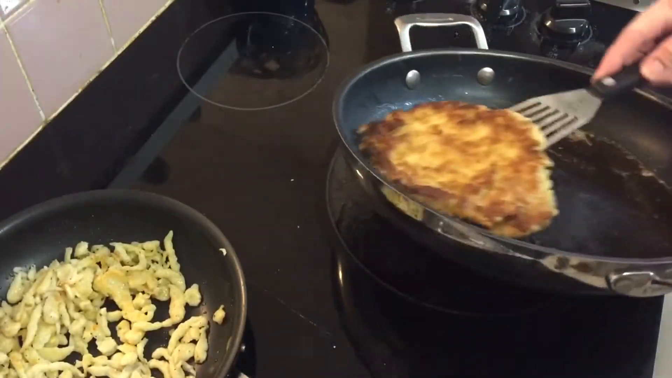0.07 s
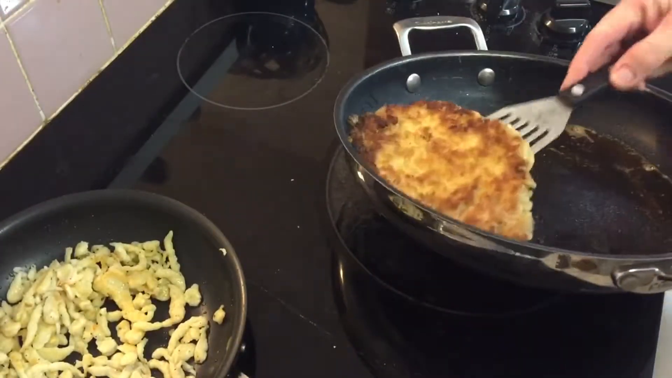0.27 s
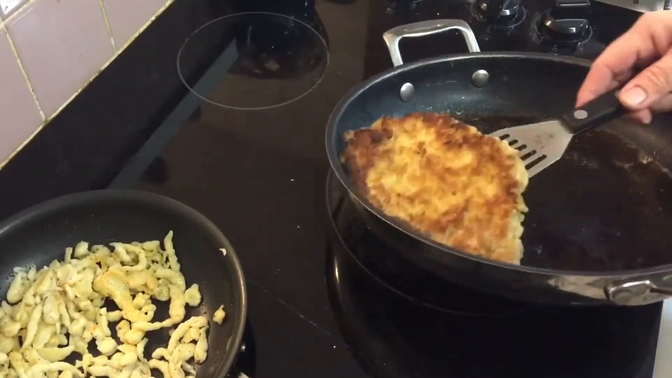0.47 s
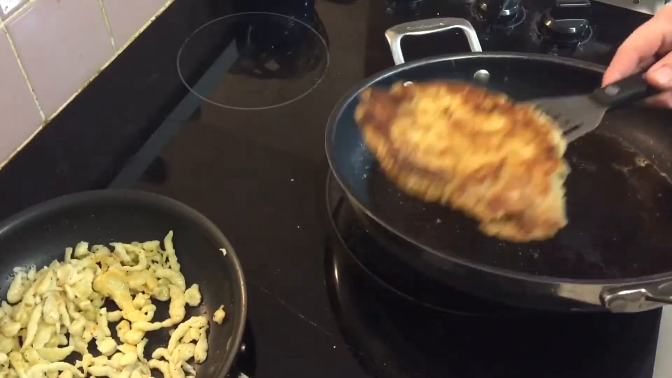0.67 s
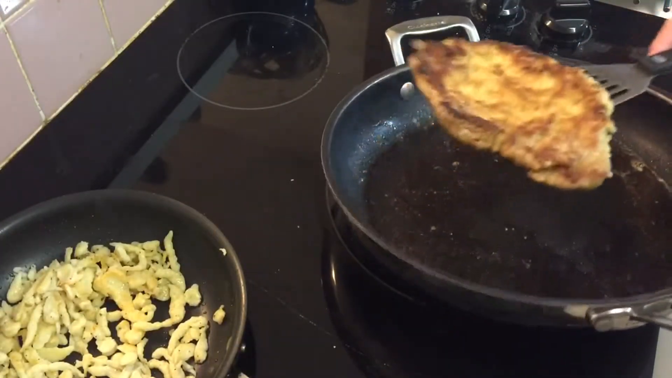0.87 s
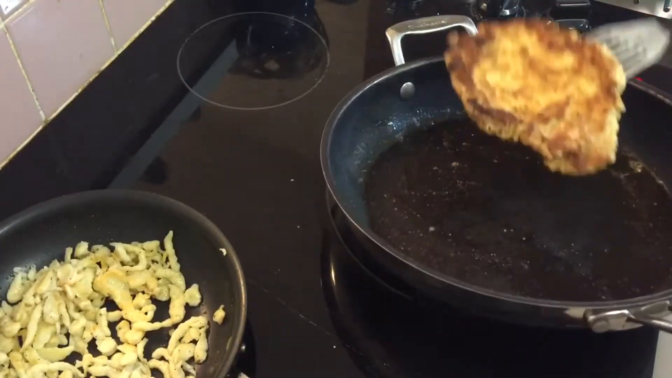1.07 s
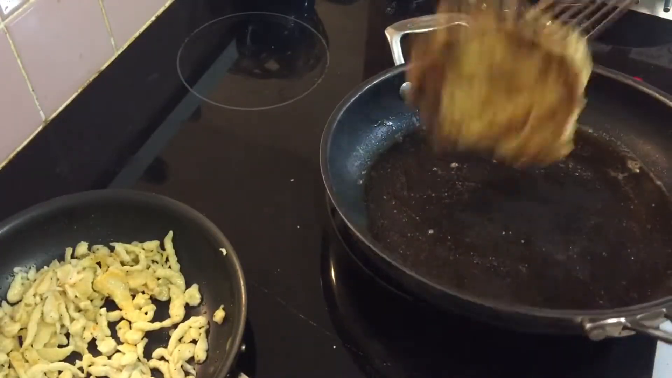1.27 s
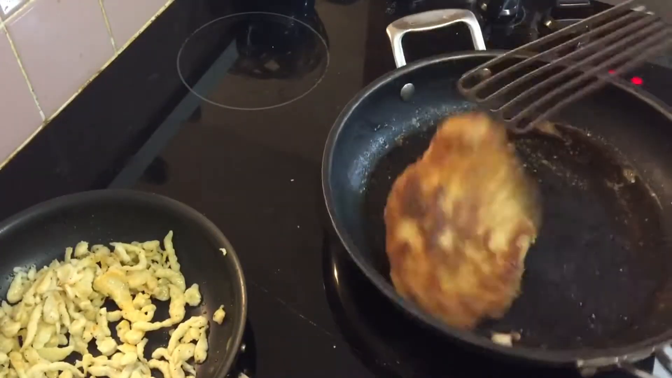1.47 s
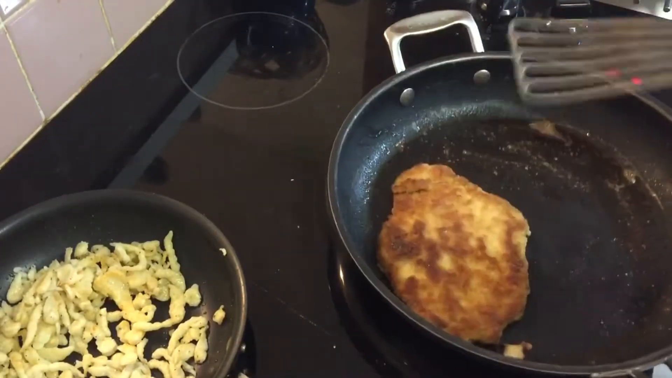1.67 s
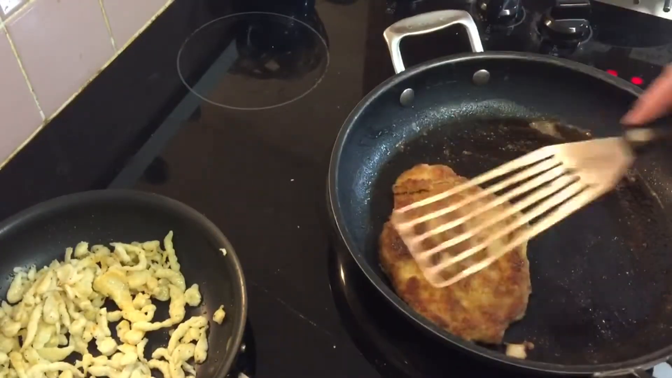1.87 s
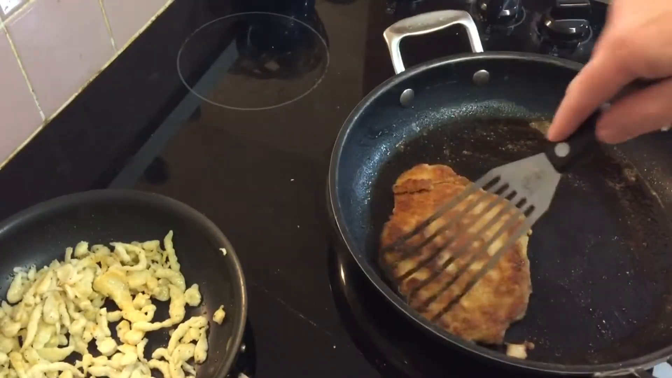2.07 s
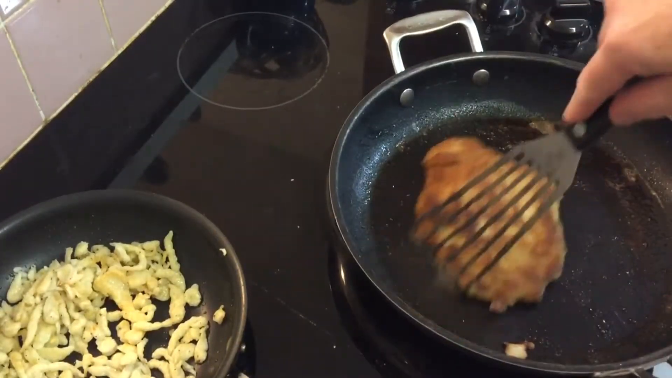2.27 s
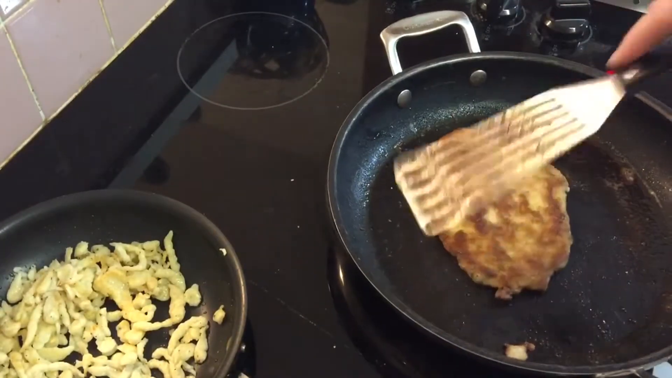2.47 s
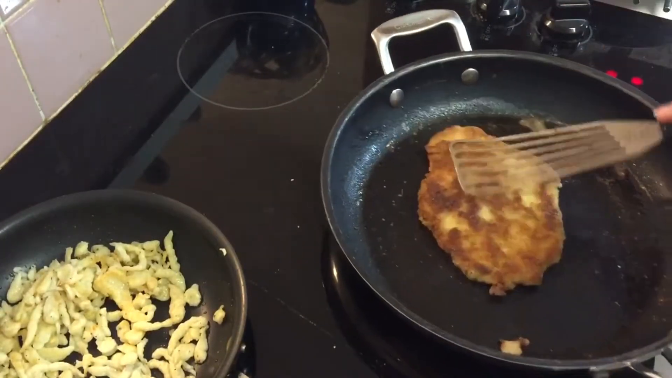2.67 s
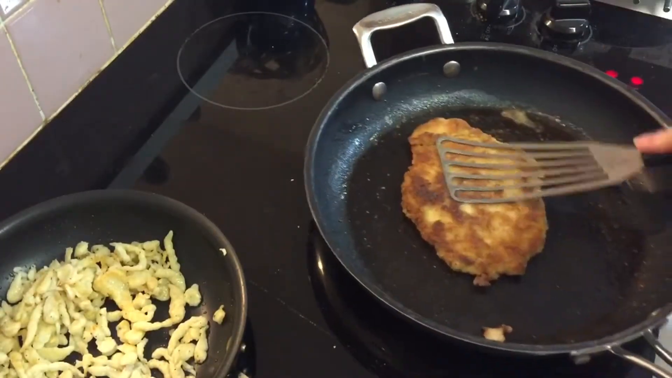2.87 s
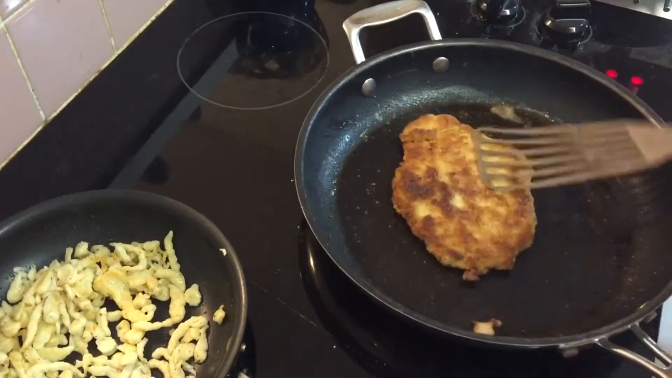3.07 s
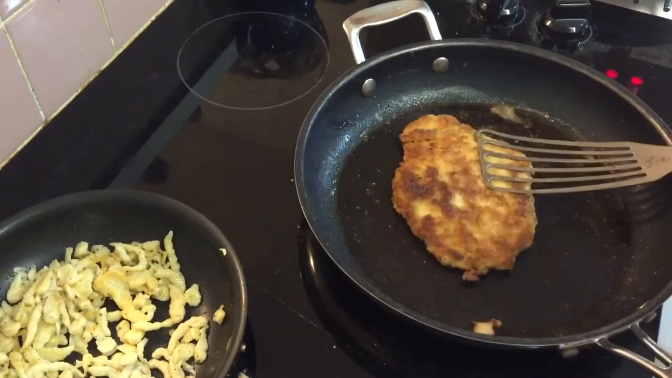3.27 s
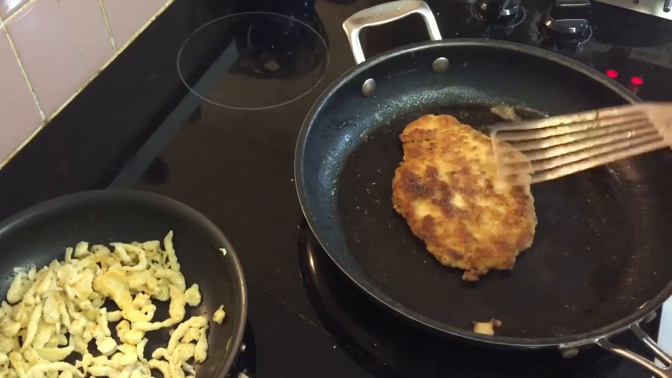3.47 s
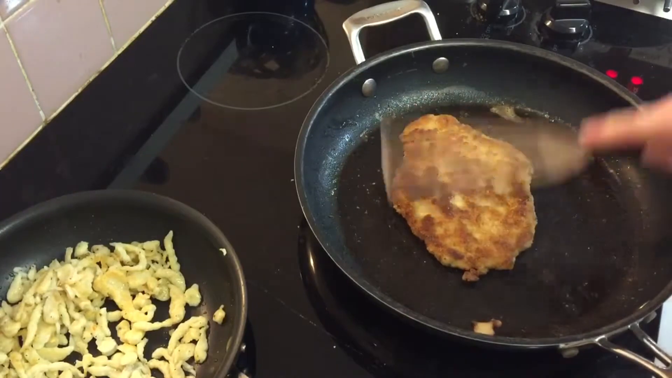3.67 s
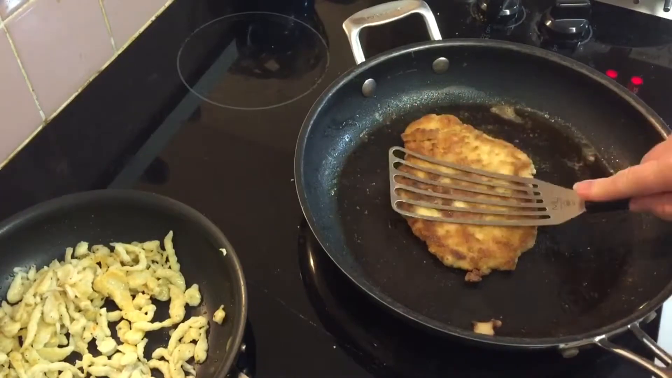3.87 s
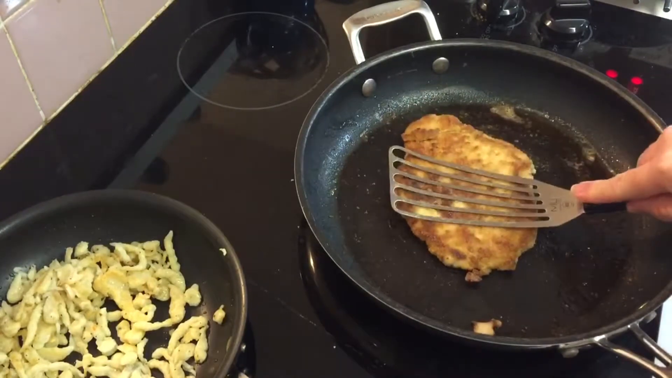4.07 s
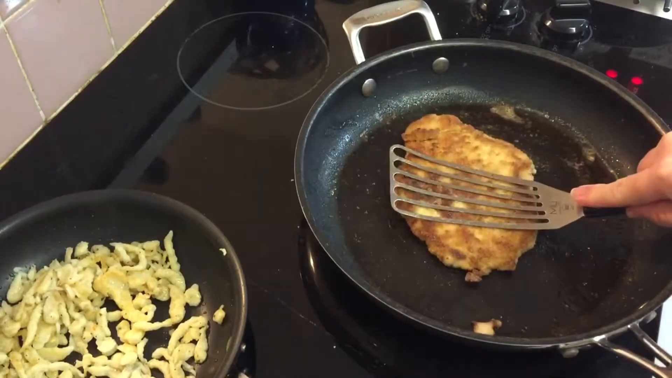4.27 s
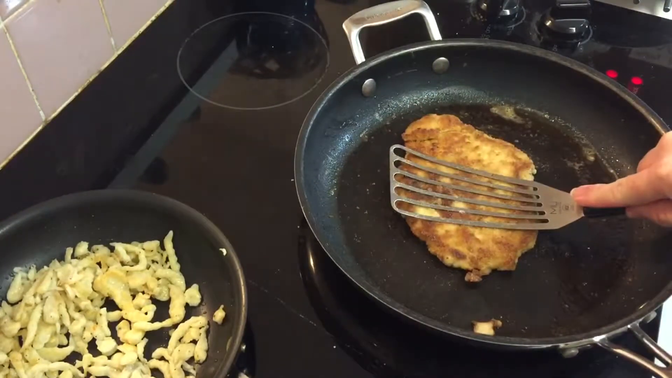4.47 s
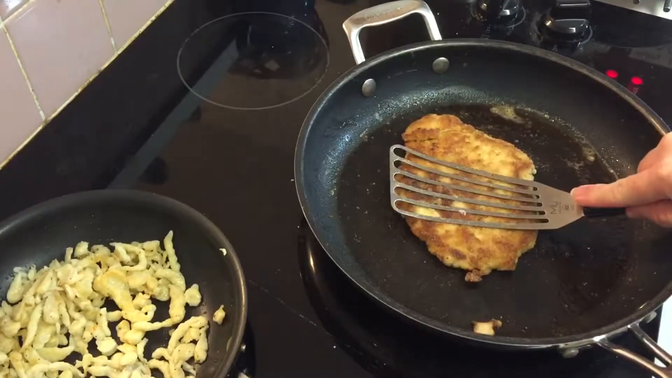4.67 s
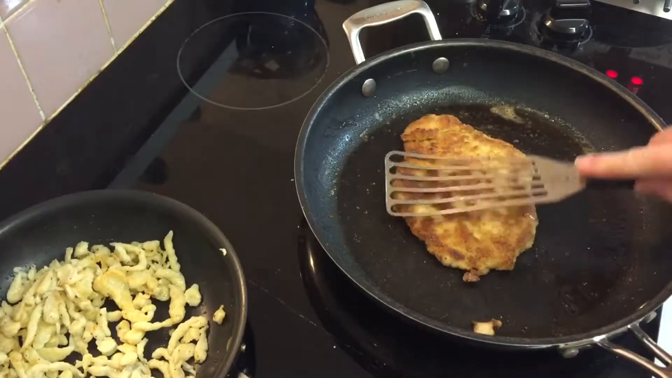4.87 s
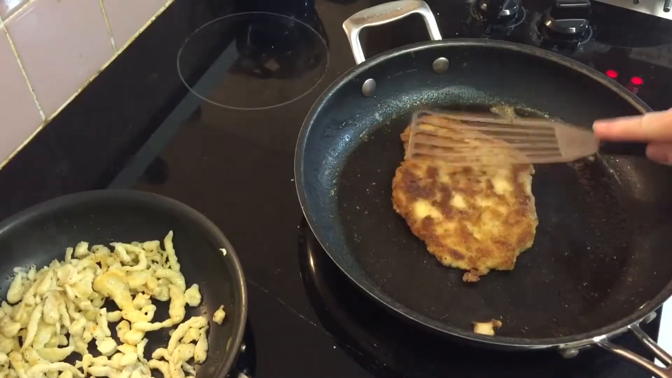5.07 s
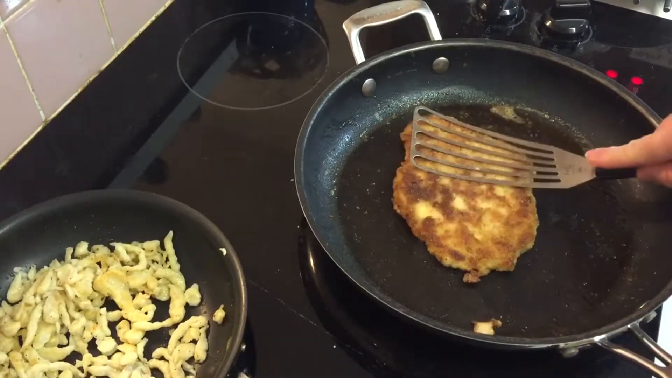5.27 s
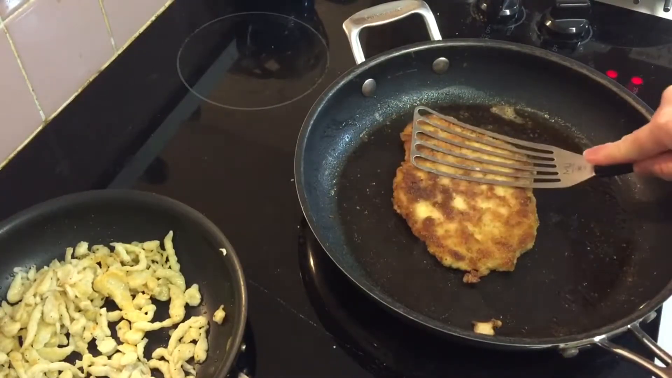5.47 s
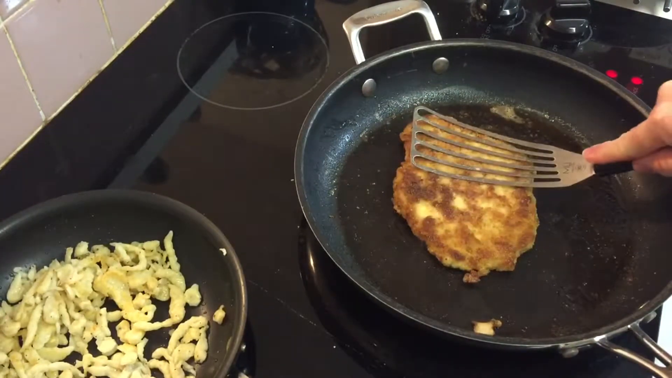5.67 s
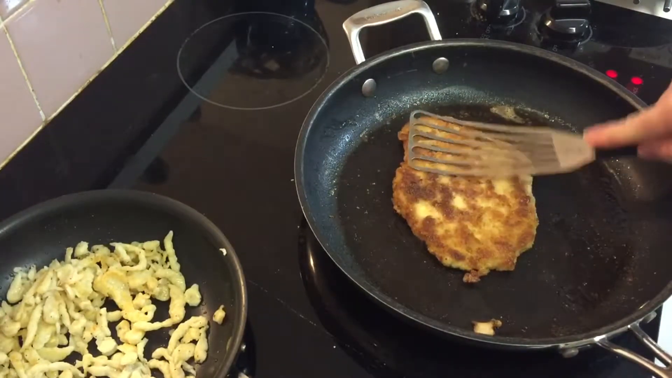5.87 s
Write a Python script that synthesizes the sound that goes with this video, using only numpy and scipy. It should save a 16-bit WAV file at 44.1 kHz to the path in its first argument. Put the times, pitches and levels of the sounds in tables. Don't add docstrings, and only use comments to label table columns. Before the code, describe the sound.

Close and dry, over a faint low mains hum and soft fan murmur, a thin sizzle opens with light, raspy metal scrapes of a spatula until about 0.6 s, with small bumps near 0.4 s. The frying drops to almost nothing while the cutlet is lifted; isolated oil drops pop with dull plops, clustering from 0.97 to 1.11 s. At about 1.4-1.7 s the meat lands with soft low knocks, a short scrape and a gush of steam with faint breathy whistles. Fine crackling spits follow around 1.9-2.03 s. A stronger dull pat thuds at 2.15 s, then a bright steam burst and sharp snap at 2.34 s. Sizzling grows; another firm, clicking pat hits at 3.21 s and a lighter metallic tap at 3.78 s, among loud spits. From 3.9 s pressing brings a full, dense sizzle, easing around 5 s, with small pops and a barely audible tap near 5.16 s, then continuing steadily to the end.

```python
import sys
import numpy as np
from scipy import signal
from scipy.fft import rfft, irfft
from scipy.io import wavfile

SR = 44100
rng = np.random.default_rng(int(sys.argv[2]) if len(sys.argv) > 2 else 0)


def magnitude_from_level(level_db):
    exponent = np.asarray(level_db, float) / 20
    return 10 ** exponent


def master(y):
    cut = np.clip(np.atleast_2d(y).T, -1, 1)
    pcm = np.round(cut * 32767)
    wavfile.write(sys.argv[1], SR, pcm.astype(np.int16))


N = 261513

# time in seconds, level in dB.
HUM_LEVEL = [
    (0, -57.5),
    (1.7, -58.5),
    (2.1, -61.5),
    (3.02, -61),
    (3.24, -58),
    (3.85, -60),
    (3.93, -70),
    (3.98, -59),
    (5.93, -59.5),
]
# frequency in Hz, level in dB per Hz.
FAN_COLOUR = [(15, -64), (25, -22), (69, -2.5), (94, -7), (119, 1.5), (145, -8), (189, -8), (246, 0.5),
              (325, -7.5), (700, -22.5), (910, -66), (1540, -120)]
# peak in seconds, level in dB, rise in seconds, fall in seconds.
HOB_SHUDDERS = [
    (0.124, -58.5, .02, 0.27),
    (1.58, -58, 0.031, 0.39),
    (1.71, -56, 0.26, 0.041),
    (2.175, -46, .01, 0.21),
    (2.8, -65.5, .1, 0.72),
    (.62, -66, .05, 0.17),
    (3.27, -49.5, 0.021, 0.11),
]
# start in seconds, length in seconds, first pitch in Hz, last pitch in Hz, level in dB.
STEAM_WHISTLES = [
    (1.66, .49, 1012, 960, -55),
    (2.41, .15, 1750, 2250, -47),
    (2.46, .12, 2650, 2700, -53),
    (2.47, .13, 965, 994, -58),
    (1.74, .44, 2100, 2050, -58.5),
    (1.8, .33, 297, 300, -63),
    (1.41, .09, 1700, 1750, -48),
    (5.5, .6, 3500, 3510, -50),
]
# time in seconds, peak in dB,
# favoured pitch in Hz, fall away from it in dB per octave, contact time in seconds.
PAT_HITS = [(0.39, -43, 290, 12, 0.04), (0.44, -47.5, 204, 3, .014), (1.388, -43.5, 252, -6, 0.019),
            (1.569, -42, 213, 15, 0.014), (1.615, -29.5, 1390, -1, 0.014), (1.62, -29.5, 284, -5.8, 0.0081),
            (1.646, -35.5, 180, 2, 0.016), (1.691, -47.5, 55, 8, 0.041), (2.153, -35, 1120, -3, 0.0033),
            (2.155, -20.5, 290, 21, 0.0067), (2.168, -39, 306, 22, 0.0074), (2.184, -32.5, 196, 13, .02),
            (3.143, -45, 128, 12, 0.0029), (3.2106, -25.5, 2300, -10, 0.0024),
            (3.2107, -20.5, 330, 16.5, 0.0054), (3.2217, -28.5, 534, 9, 0.029), (3.211, -32, 97, 10, .01),
            (3.782, -25.5, 2095, 15, 0.0027), (3.784, -32, 720, 15, 0.0057), (3.782, -33.5, 146, 1, 0.0028),
            (5.165, -45, 950, 12, 0.0025), (5.164, -50.5, 230, 9, .004), (5.318, -53, 199.5, 10, .009)]
# pitch in Hz, level in dB, time to fall
# 60 dB in seconds.
HOB_AND_PAN_TONES = [(55, -0.5, 0.36), (97, 7.5, 0.089), (155, 1, 0.11), (196, -2, 0.102),
                     (290, 4, 0.033), (338, 4, 0.024), (419, -7, 0.044), (488, -8.5, 0.032), (588, -7, 0.063),
             (765, -3.5, 0.022), (950, -11, 0.024), (1120, 1.5, 0.042), (1420, -4.5, 0.038),
             (1610, 4, 0.051), (2040, 0, 0.026), (2310, -18, 0.036), (2500, 6, 0.036), (3400, 7, .02)]
# start in seconds, length in seconds, level in dB,
# favoured pitch in Hz, fall away from it in dB per octave.
BLADE_STROKES = [(-.04, 0.074, -54.5, 3750, 9), (-.03, 0.12, -57, 2850, 36), (0, 0.18, -55.5, 1900, 40),
                 (0.094, 0.095, -61, 4300, 10), (0.186, .08, -59.5, 2700, 40),
                 (0.293, .11, -47.5, 2700, 26), (0.305, 0.088, -51.5, 1935, 25),
                 (0.343, 0.12, -49, 2310, 45), (0.364, 0.07, -48.5, 4570, 6.5), (.42, 0.17, -64, 2420, 17),
                 (1.515, 0.064, -48.5, 1950, 23), (1.623, 0.041, -44.5, 1950, 40)]
# pitch in Hz, level in dB.
BLADE_TONES = [(1390, 3), (1935, -1), (2310, -6.5), (2440, -13), (2700, -3.5), (2850, -7.5), (3700, 0),
               (3800, 0.5), (4050, -9), (4610, 2), (4850, 0), (5300, -8), (6200, -4), (6730, -7)]
# time in seconds, peak in dB, ring in Hz, plop level in dB, plop pitch in Hz.
BIG_DROPS = [(0.166, -19.5, 11700, -36, 1920), (0.3583, -22, 4510, -28, 1385),
             (0.644, -39, 6010, -13, 1090), (0.6641, -24, 5900, -12.5, 914),
             (0.9712, -24, 5430, -11.5, 1230), (1.0098, -33.5, 6360, -37, 1870),
             (1.0737, -37, 7930, -20, 1750), (1.0823, -21, 5360, -50, 1750), (1.0964, -35, 5300, -26, 1790),
             (1.1143, -31.5, 8900, -10, 1920), (1.6172, -25, 5470, -9, 1350), (2.339, -10, 6940, -29, 2100),
             (2.7134, -18, 5440, -29, 2055), (3.2106, -13.5, 6800, -29, 1100),
             (3.7534, -11.5, 6640, -41, 1990)]
# time in seconds, peak in dB.
SMALL_DROPS = [(0.7355, -35), (1.9066, -17), (1.956, -21), (1.9912, -22), (2.0302, -24), (2.6276, -21),
               (2.684, -30), (3.14, -18), (3.1646, -16), (3.7224, -13), (3.8864, -15.5), (5.124, -18.5),
               (5.1644, -17.5), (5.4445, -17)]
# time in seconds, level of the finest bubbles in dB, lean toward big bubbles in dB.
STEADY_FRYING = [(0, -53, 19), (.27, -58.5, 14.5), (.45, -57, 25), (.65, -67, 15), (1.38, -66, -11),
                 (1.45, -47.5, 12), (1.77, -42, -5), (2.12, -43, 1), (2.55, -38.5, -8), (2.78, -45.5, -6.5),
                 (3.11, -44.5, -9), (3.25, -32, 0), (3.85, -36, -0.5), (3.92, -29, 6), (4.85, -28, 3.5),
                 (5.0, -33, -5), (5.33, -33, -6.5), (5.4, -32.5, 8.5)]
# peak in seconds, level in dB,
# rise in seconds, fall in seconds, lean toward big bubbles in dB.
STEAM_GUSHES = [(.12, -36.5, .3, 0.14, -3), (0.378, -37.5, 0.069, 0.042, 7), (1.44, -33, 0.042, 0.11, 9),
                (1.645, -34, 0.096, 0.16, 14), (1.9, -42, .08, 0.089, 6), (2.26, -49, 0.048, 0.49, 26.5),
                (2.334, -25, 0.097, 0.1, -2), (2.4, -39.5, 0.29, 0.11, 18.5), (2.93, -30, 0.16, 0.28, 3.5),
                (3.42, -29, 0.48, 0.78, 1.5), (3.72, -37, 0.12, 0.3, -3), (4.03, -33.5, 0.13, 1.4, 8.5),
                (4.7, -33.5, 1, 0.09, 7), (5.12, -43, 0.092, 0.08, -3), (5.22, -33.5, 0.059, 0.097, -8),
                (5.44, -38.5, 0.33, 0.67, 9)]
BUBBLE_EDGES_HZ = [15900, 5500, 2500, 1150, 530]
BUBBLE_DB = [0, -11.5, -19.5, -27.5]
EMPTY_OIL_DB = [-56.5, -70.5, -68.5, -79]
FRYING_LEANS = [0.16, 0.59, 0.66, 0.71]
STEAM_LEANS = [0, .5, .85, 1.05]
# frequency in Hz, level in dB per Hz.
BUBBLE_COLOUR = [(310, -48), (530, -24.5), (577, -28), (1000, -27.5), (1170, -16.5), (2160, -16),
                 (3120, -1.5), (4840, -3), (5340, -1.5), (7620, 1), (9030, 3.5), (10400, 2), (15700, -5)]
# frequency in Hz, width in Hz, share removed from 0 to 1.
ECHO_DIPS = [(4890, 115, 0.88), (7760, 1080, 0.39), (10510, 760, 0.5), (12800, 400, 0.3)]


def rms_one(x):
    return x / np.sqrt(np.mean(x ** 2) + 1e-20)


def filtered(x, order, hz, kind):
    return signal.sosfilt(signal.butter(order, hz, kind, fs=SR, output="sos"), x)


def in_time(rows):
    s, *columns = np.transpose(rows)
    return [np.interp(np.arange(N) / SR, s, column) for column in columns]


def at_hz(points, hz):
    table_hz, db = np.array(points)[:, 0], np.array(points)[:, 1]
    return np.interp(np.log(hz), np.log(table_hz), db)


def drift(rate_hz):
    r = np.exp(-2 * np.pi * rate_hz * 40 / SR)
    noise = rng.standard_normal(N // 40 + 2002)
    slow = signal.lfilter([1], [1, -2 * r, r * r], noise)[2000:]
    slow = rms_one(slow - slow.mean())
    return np.interp(np.arange(N) / 40, np.arange(len(slow)), slow)


def ring(clicks, hz, t60):
    r = magnitude_from_level(-60 / (t60 * SR))
    w = 2 * np.pi * hz / SR
    return signal.lfilter([0, np.sin(w)], [1, -2 * r * np.cos(w), r * r], clicks + 1e-18)


def grains(per_s, spread_db):
    sizes = magnitude_from_level(spread_db * np.minimum(rng.exponential(1, N), 4.5))
    sizes = sizes * rng.choice([-1, 1], N)
    return rms_one(sizes * (rng.random(N) < per_s / SR))


def swell(peak_s, db, rise_s, fall_s):
    t = np.arange(N) / SR - peak_s
    return db - 20 * np.where(t < 0, -t / rise_s, t / fall_s)


def appliances(coarse):
    hum_db, = in_time(HUM_LEVEL)
    hum_hz = 118.9 + 0.38 * drift(1.44)
    phase = 2 * np.pi * np.cumsum(hum_hz) / SR + 0.34 * drift(35.0)
    hum = magnitude_from_level(hum_db + 3 + 1.6 * drift(4.6)) * np.sin(phase)

    bins_hz = np.maximum(np.arange(N // 2 + 1) * SR / N, 1)
    spectrum = rfft(rng.standard_normal(N)) * magnitude_from_level(at_hz(FAN_COLOUR, bins_hz))
    murmur = irfft(spectrum * (bins_hz < 2500), N)
    low = magnitude_from_level(-62 + 0.5 * drift(3.4)) * filtered(rms_one(murmur), 2, 150, "low")
    upper = rms_one(filtered(murmur, 4, [160, 470], "band"))
    shaken = magnitude_from_level(-81.5) + magnitude_from_level(-17) * coarse
    shaken = shaken + sum(magnitude_from_level(swell(*row)) for row in HOB_SHUDDERS)
    return hum + low + shaken * magnitude_from_level(3.5 * drift(14.0)) * upper


def whistles():
    edge_s, sag_db_per_s = 0.04, 12
    out = 0
    for s, length, first_hz, last_hz, db in STEAM_WHISTLES:
        t = np.arange(N) / SR - s
        pitch_hz = first_hz + (last_hz - first_hz) * np.clip(t / length, 0, 1)
        phase = 2 * np.pi * np.cumsum(pitch_hz) / SR
        width_hz = max(0.17 * (first_hz - 900), 20)
        edges = np.clip(np.minimum(t, length - t) / edge_s, 0, 1) ** 2
        breath = drift(width_hz) * np.sin(phase) + drift(width_hz) * np.cos(phase)
        out = out + edges * magnitude_from_level(db - sag_db_per_s * t.clip(0, length)) * breath
    return out


def pats():
    out, span = np.zeros(N + 12000), np.arange(12000) / SR
    noises = rng.standard_normal((len(PAT_HITS), len(span)))
    for (s, peak_db, best_hz, fall_db, touch_s), noise in zip(PAT_HITS, noises):
        contact = 0.078 * noise * np.exp(-span / touch_s)
        contact[0] += 1
        hit = 0
        for k, (hz, db, t60) in enumerate(HOB_AND_PAN_TONES):
            tone_db = db - fall_db * abs(np.log2(hz / best_hz))
            hit = hit + (-1) ** k * magnitude_from_level(tone_db) * ring(contact, hz, t60)
        hit = filtered(hit, 2, [0.55 * best_hz, 2.6 * best_hz], "band")
        at = round(s * SR)
        out[at:at + len(span)] += magnitude_from_level(peak_db) * hit / np.abs(hit).max()
    return filtered(out[:N], 2, [40, 5000], "band")


def scraping():
    out, t = np.zeros(N + SR), np.arange(SR // 2) / SR
    slips = grains(4000, spread_db=1.0)
    for start, length, level_db, best_hz, fall_db in BLADE_STROKES:
        at = max(round(start * SR), 0)
        progress = np.clip((t + at / SR - start) / length, 0, 1)
        stroke = slips[at:at + len(t)] * np.sqrt(np.sin(np.pi * progress).clip(0))
        rasp = filtered(stroke, 2, [0.57 * best_hz, 1.65 * best_hz], "band")
        layers = [(rasp, 6.5 - 0.52 * fall_db)]
        for hz, db in BLADE_TONES:
            tone = ring(stroke, hz, 300 / hz)
            layers.append((tone, db - fall_db * abs(np.log2(hz / best_hz))))
        for layer, db in layers:
            strength = np.sqrt(np.sum(layer ** 2) / (length * SR))
            out[at:at + len(t)] += magnitude_from_level(level_db + db) * layer / strength
    return out[:N]


def spits():
    out, span = np.zeros(N + 2000), np.arange(2000) / SR
    drops = BIG_DROPS + [(s, db, 9100, -37, 2053) for s, db in SMALL_DROPS]
    noises = rng.standard_normal((len(drops), 2000))
    for (s, peak_db, hz, plop_db, plop_hz), noise in zip(drops, noises):
        crack = 0.58 * signal.lfilter([1, -0.9], [1], noise) * np.exp(-span / 0.00069)
        ping = 1.02 * np.sin(2 * np.pi * hz * span) * np.exp(-span / 0.00044)
        snap = magnitude_from_level(plop_db + 10.5) * np.sin(2 * np.pi * 2900 * span) * np.exp(-span / 0.00032)
        plop = magnitude_from_level(plop_db - 3.0) * np.sin(2 * np.pi * plop_hz * span) * np.exp(-span / 0.0011)
        pop = crack + ping + snap + plop
        pop = pop + 0.55 * np.roll(pop, round(SR / plop_hz))
        echo = 0.16 * np.roll(pop, 150) + 0.079 * noise[::-1] * np.exp(-span / 0.018)
        at = round(s * SR)
        out[at:at + 2000] += magnitude_from_level(peak_db - 2.0) * (pop + echo)
    return filtered(out[:N], 6, 800, "high")


def crackle():
    ticks = filtered(grains(160, spread_db=2.5), 2, 6000, "high")
    hiss = filtered(grains(9000, spread_db=3.0), 4, 11000, "high")
    steady_db, lean_db = in_time(STEADY_FRYING)
    level_db = -21 + 0.7 * steady_db - 0.9 * lean_db
    return magnitude_from_level(level_db) * (0.75 * rms_one(ticks) + rms_one(hiss))


def boil():
    steady_db, lean_db = in_time(STEADY_FRYING)
    gush_leans_db = np.outer(STEAM_LEANS, [row[-1] for row in STEAM_GUSHES])
    gushes = magnitude_from_level(2 * gush_leans_db) @ [magnitude_from_level(2 * swell(*row[:-1])) for row in STEAM_GUSHES]
    frying = gushes + magnitude_from_level(2 * (steady_db + np.outer(FRYING_LEANS, lean_db)))
    return np.sqrt(magnitude_from_level(2 * np.c_[EMPTY_OIL_DB]) + magnitude_from_level(2 * np.c_[BUBBLE_DB]) * frying)


def sizzle(bubbles):
    out = 0
    seethe_db = 0.075 * drift(6.1) + 0.5 * drift(58.0)
    splatter = grains(1500 * magnitude_from_level(1.5 * drift(14.0)), spread_db=3.0)
    splatter_shares = [0.46, 0.35, 0.41, 0.14]
    for gain, high, low, shared in zip(bubbles, BUBBLE_EDGES_HZ, BUBBLE_EDGES_HZ[1:], splatter_shares):
        edges, crowd = np.geomspace(low, high, 8), 0
        for hz in np.sqrt(edges[1:] * edges[:-1]):
            bursts = grains(1.1 * hz, spread_db=2.5) + shared * splatter
            level = magnitude_from_level(at_hz(BUBBLE_COLOUR, hz) + 1.4 * drift(11.0)) * np.sqrt(hz)
            crowd = crowd + level * rms_one(ring(bursts, hz, 17.0 / hz))
        crowd = filtered(crowd, 4, [low, 1.15 * high], "band")
        out = out + gain * magnitude_from_level(seethe_db) * rms_one(crowd)
    return out


def scene():
    bubbles = boil()
    pan = sizzle(bubbles) + crackle() + spits() + scraping()
    for hz, width_hz, share in ECHO_DIPS:
        b, a = signal.iirpeak(hz, hz / width_hz, fs=SR)
        pan = pan - share * signal.lfilter(b, a, pan)
    mix = pan + pats() + whistles() + appliances(bubbles[-1])
    return np.tile(mix, (2, 1))


def band_limit(x):
    return signal.sosfilt(signal.butter(12, 15670, fs=SR, output="sos"), x)


def record(dry):
    return band_limit(dry)


dry = scene()
out = record(dry)
master(out)
```